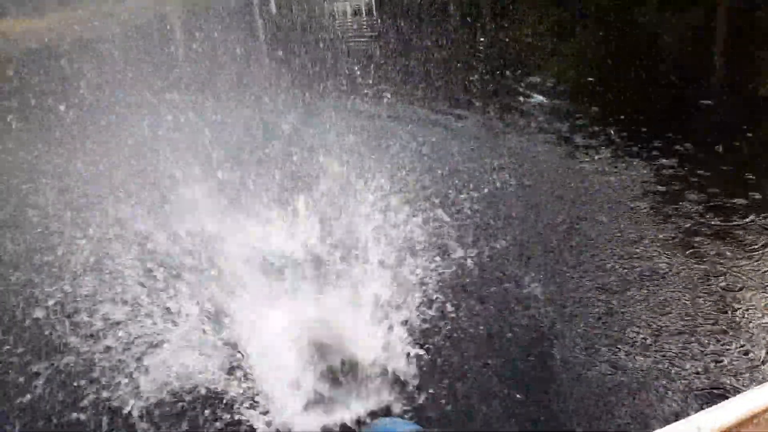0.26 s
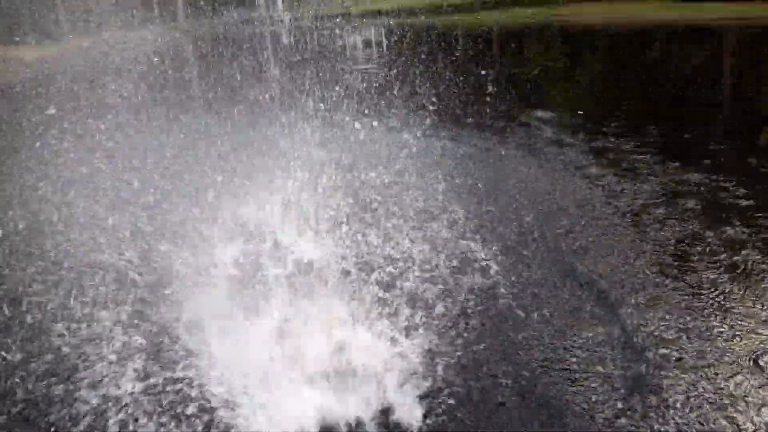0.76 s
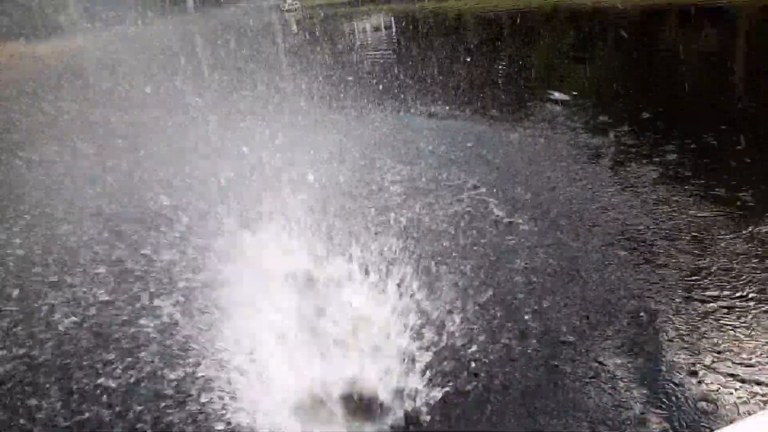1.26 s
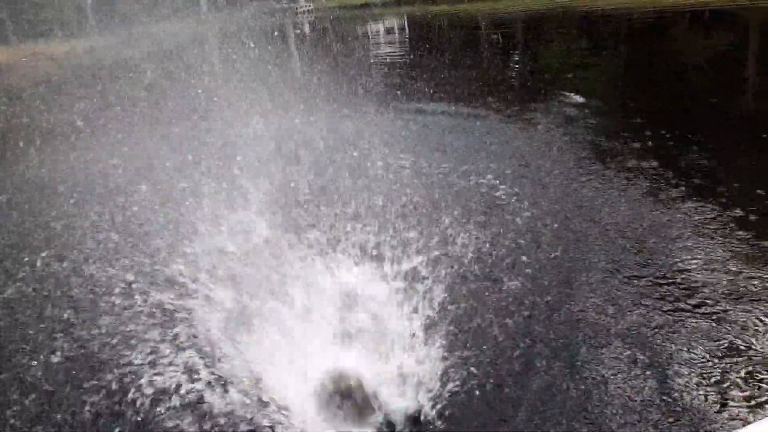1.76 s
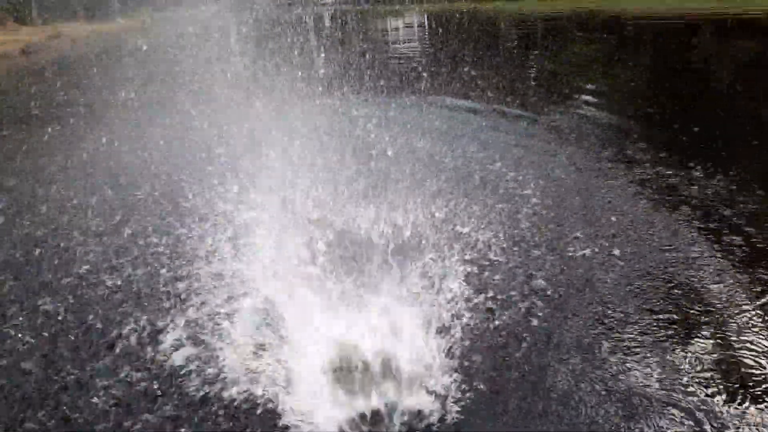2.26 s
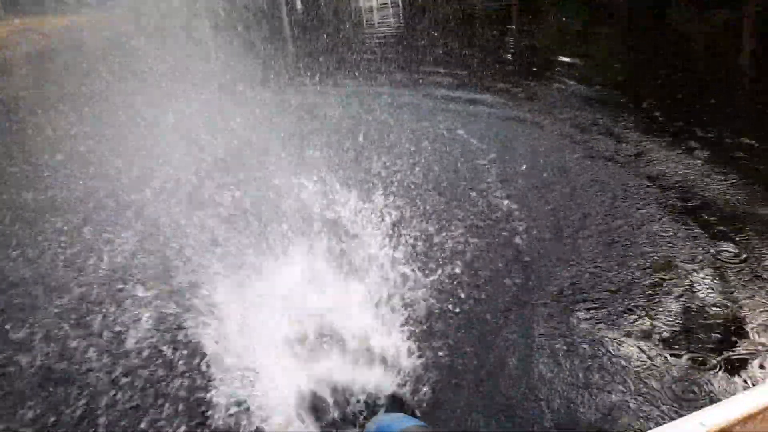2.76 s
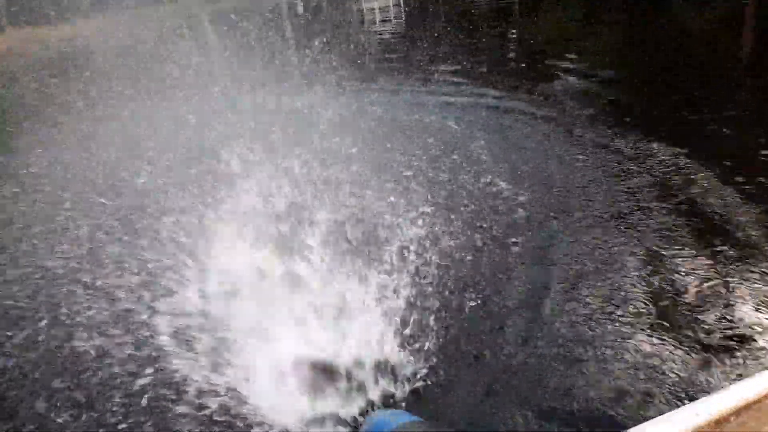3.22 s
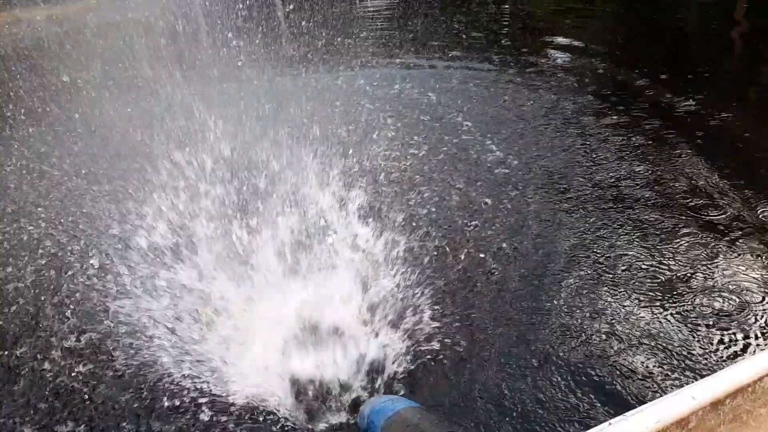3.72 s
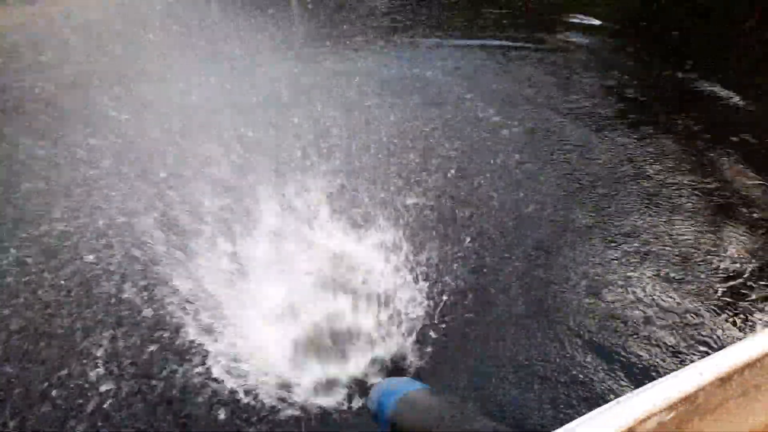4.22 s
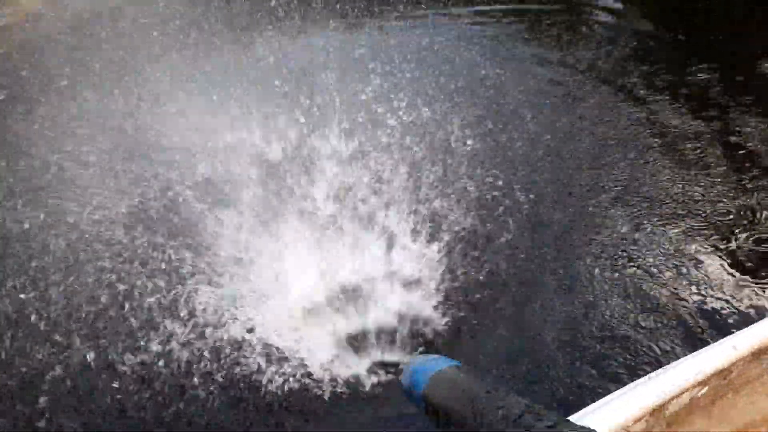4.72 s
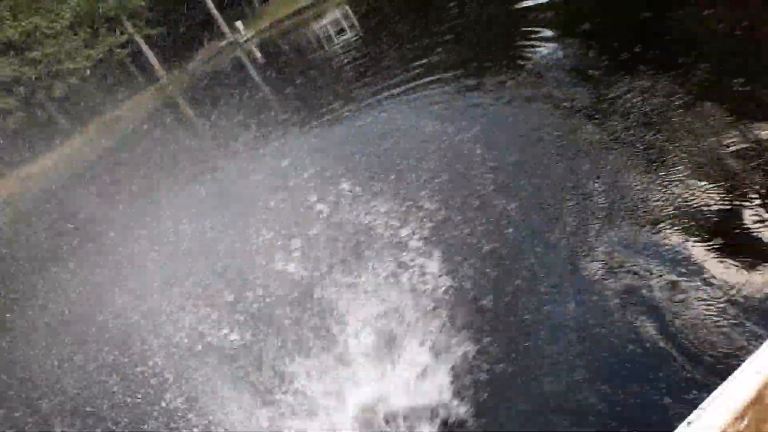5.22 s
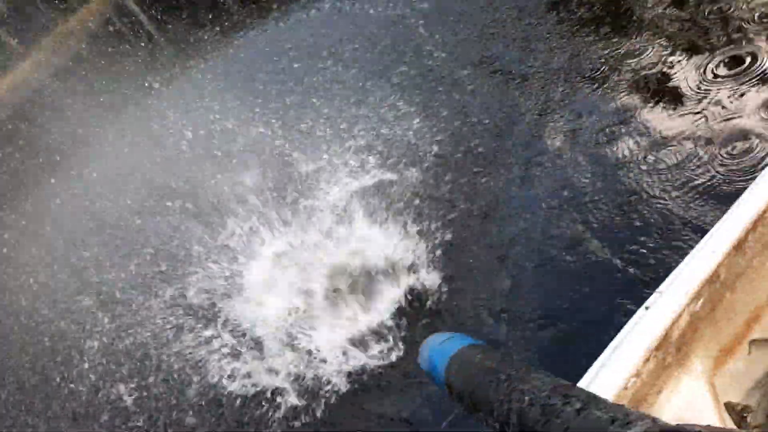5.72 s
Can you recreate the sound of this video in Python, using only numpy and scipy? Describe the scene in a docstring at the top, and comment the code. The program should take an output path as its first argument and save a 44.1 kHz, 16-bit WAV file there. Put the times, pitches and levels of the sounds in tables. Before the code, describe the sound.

For six seconds an electric pump runs at practically constant high speed, already going at the start and still going at the end. It stands close, to the right: a steady hum near 377 Hz, a buzzing tone near 3 kHz and a dominant piercing whine around 4.5 kHz, wrapped in rough, rushing cooling air. Ahead and wide, a hose jet pounds a pond with dense bright hiss, fine droplets and low bubbling. Short, soft gulps of trapped air occur near 0.1, 0.5, 0.75, 0.9, 1.1, 1.3, 1.85, 2.8 and 4.6 s. The whine sinks clearly around 2.1-2.3 s, then returns. At about 5.1 s the upper hiss dulls a little. Near 5.6 s the microphone turns towards the hose: the whine drops briefly, jumps up loud by 5.7 s, then eases, while the hum strengthens and the spray brightens. Open air, close hand-held stereo, little audible echo.

```python
"""A fast electric pump to the right sounds a shaft hum, a piercing whine and rushing cooling air.
Its tones are harmonics locked to one shaft phase; its air is noise shaped by spectral peaks and hollows.
Ahead, its hose drives a steady jet into a pond: ringing bubbles, foam and droplets, with gulps of air.
As the hand-held camera moves, the whine fades and swells; near the end it turns towards the hose
and the tones change balance."""
import sys
import numpy as np
from scipy import signal
from scipy.fft import rfft, irfft, next_fast_len
from scipy.io import wavfile
from scipy.ndimage import uniform_filter1d, minimum_filter1d, map_coordinates

SR = 44100
rng = np.random.default_rng(int(sys.argv[2]) if len(sys.argv) > 2 else 0)


def persist_wave(psi):
    """Save psi, clipped to +-1, as 16-bit WAV."""
    counts = np.round(np.clip(psi, -1, 1) * 32767).astype(np.int16)
    wavfile.write(sys.argv[1], SR, np.atleast_2d(counts).T)


N = 263718

# pump tones before fades: [order (multiple of shaft speed), rms level/dB, left minus right/dB]
PUMP_TONES = [(0.5, -52.5, -2.8), (1, -26.5, -4.1), (2, -43.3, -6.9), (4, -30.3, -3.3), (5, -42.3, -4.8),
              (6, -32.8, -3.5), (7, -42.3, -3.6), (8, -23.5, -5.0), (9, -42.7, -2.7), (10, -38.6, -5.7),
              (11, -43.2, -7.2), (12, -16, -7.2), (13, -39.5, -3.8), (14, -41.0, -4.5), (15, -43.5, -1.4),
              (16, -37.1, 0.3), (17, -44.6, -2.0), (18, -33.5, -0.7), (19, -45.9, 1.4), (23, -51.4, -2.7),
              (24, -45.2, -3.0), (31, -48.6, -5.9), (36, -49.5, 0.5)]
# shaft hum, order 1; only departures from the mean count: [t/s, level/dB]
HUM_FADES = [(0.0, -27.5), (0.06, -27), (1.78, -28), (1.96, -30), (4.68, -26), (4.75, -29), (5.75, -28),
             (5.86, -22), (5.98, -23.5)]
# vane tone, order 8, likewise: [t/s, level/dB]
VANE_FADES = [(0.0, -24.5), (2.05, -25.5), (2.08, -32), (2.21, -25), (4.83, -24), (5.01, -22.5),
              (5.63, -23.5), (5.98, -29)]
# whine, order 12, likewise: [t/s, level/dB]
WHINE_FADES = [(0, -15), (0.45, -13.5), (1.0, -15.5), (1.92, -16), (2.13, -23.5), (2.26, -24.5),
               (2.42, -16.5), (2.85, -14.5), (3.2, -16), (3.65, -13.5), (4.2, -14), (4.45, -16),
               (5.07, -16), (5.15, -14), (5.45, -14.5), (5.57, -23.5), (5.68, -11), (5.76, -12),
               (5.9, -17.5)]
# weaker tones that shift as the camera moves: [order, drift/(dB/s), change with the turn/dB]
TONE_SHIFTS = [(2, -1, 12), (4, -1, 3), (6, -1.2, 0), (11, 0.5, 4), (16, 1, -4), (18, -0.9, 4)]
# cooling-air spectrum before its peaks and hollows: [f/Hz, level/dB per Hz]
AIR_SPECTRUM = [(200, -87), (380, -59), (490, -74), (620, -66), (1000, -67), (1350, -55), (1800, -60.5),
                (2900, -56), (4500, -57), (5700, -66), (6700, -56), (7600, -66.5), (9500, -70),
                (15700, -74)]
# peaks (+) and hollows (-) of the cooling air, from the motor housing and surface reflections:
# [f/Hz, full width at half the dB/Hz, level/dB]
AIR_PEAKS = [(875, 80, 6), (1080, 90, 5), (1180, 70, -6), (1390, 130, -7), (1680, 140, 5), (2255, 60, 6),
             (5300, 300, 3.5), (11680, 450, 7.5)]
# stereo balance of the cooling air: [f/Hz, left minus right/dB]
AIR_BALANCE = [(500, 1.5), (1500, -8), (4000, -2), (6000, -2), (9000, 1), (12000, -5)]
# lag of the pump's sound at the left port, bent round the camera body: [f/Hz, delay/ms]
LEFT_LAG = [(376, .38), (750, .24), (1500, .335), (3000, .362), (4520, .416), (5300, .372), (6000, .33),
            (9000, .36), (15000, .345)]
# weighting of the splash where the jet strikes the pond: [f/Hz, gain/dB]
SPLASH_SPECTRUM = [(25, -92), (58, -102), (100, -82.5), (200, -67), (310, -60), (490, -68.5), (640, -59.5),
                   (1000, -60), (1350, -64), (2500, -62.5), (3300, -58), (3700, -60.5), (4300, -61),
                   (5200, -56), (6700, -59.5), (7500, -66), (8300, -66), (15700, -70)]
# likeness of the splash at the two microphone ports: [f/Hz, correlation from -1 to 1]
PORT_CORRELATION = [(100, 0.84), (350, 0.76), (600, 0.42), (1200, 0.14), (5000, 0.076), (14000, 0)]
# gulps, when the jet drags a pocket of air under: [t/s, rms level at the crest before pan/dB, bubble f/Hz]
AIR_GULPS = [(.08, -30, 855), (.48, -28, 880), (.74, -26, 760), (.93, -28, 1010), (1.07, -29, 875),
             (1.33, -32, 820), (1.85, -25.5, 780), (2.8, -27, 790), (4.63, -30, 940)]

# the shaft slows very slightly under its load
SHAFT_HZ, SAG_HZ_PER_S = 377.15, .19
# the turn towards the hose: middle and time scale, and the extra left-port lag it gives the pump
TURN_S, TURN_LENGTH_S, TURN_LAG_MS = 5.64, 0.086, 0.053
# the churning eases; the turn favours the spray over the cooling air
CHURN_DB_PER_S, SPRAY_TURN_DB, AIR_TURN_DB = -0.13, 2, -1.8
# the directional upper hiss creeps up, drops as the camera tilts away and partly returns with the turn
TILT_S, TILT_LENGTH_S = 5.1, 0.032
HISS_DB_PER_S, HISS_TILT_DB, HISS_TURN_DB = .2, -3, 0.4
# share of the whine's fades, in dB, that the air noise near its pitch follows
AIR_FADE_SHARE = .55
BAND_LIMIT_HZ = 15780


def pump_tones(jitter_hz=.12, flutter_db=0.68, waver_db=4.0):
    """Harmonic radiation: all tones share one shaft phase; the weak ones waver in the turbulent flow."""
    shaft_hz = SHAFT_HZ - SAG_HZ_PER_S * seconds() + jitter_hz * wobble(45)
    angle = 2 * np.pi * np.cumsum(shaft_hz) / SR
    strong = {1: HUM_FADES, 8: VANE_FADES, 12: WHINE_FADES}
    shift_db = {round(order): drift(db_per_s) + turn_db * turned()
                for order, db_per_s, turn_db in TONE_SHIFTS}
    out = np.zeros((2, N))
    for order, level_db, pan_db in PUMP_TONES:
        if order in strong:
            gain = amp(swing(strong[order]) + flutter_db * wobble(35))
        else:
            waver = unit(amp(waver_db * wobble(50)))
            gain = amp(shift_db.get(order, 0)) * waver
        phase = order * angle + 2 * np.pi * rng.random()
        tone = amp(level_db) * gain * np.sqrt(2) * np.sin(phase)
        out += panned(pan_db) * tone
    return out, angle


def cooling_air(angle, chop):
    """Flow noise: turbulence, modulated once per shaft turn, is shaped by spectral peaks and hollows."""
    turbulence = patchy(white(channels=1), depth_db=1)
    chopped = turbulence * (1 + chop * np.cos(angle))

    def response(hz):
        peaks_db = sum(db / (1 + (2 * (hz - centre_hz) / width_hz) ** 2)
                       for centre_hz, width_hz, db in AIR_PEAKS)
        ports_db = np.outer([.5, -.5], along(AIR_BALANCE, hz))
        return amp(along(AIR_SPECTRUM, hz) + peaks_db + ports_db)

    return amp(AIR_TURN_DB * turned()) * filtered(chopped, response)


def from_right(x):
    """Interaural-type delay: sound from the right reaches the left port later, more so after the turn."""
    def split_lag(hz):
        return np.exp(np.outer([-1, 1], 1j * np.pi * hz * along(LEFT_LAG, hz) / 1000))

    left, right = filtered(x, split_lag)
    delay_s = TURN_LAG_MS * turned() / 1000
    later_left = map_coordinates(left, [(seconds() - delay_s) * SR], order=5)
    return np.array([later_left, right])


def splash(foam_db=-1.5, gurgle_db=-6, droplet_db=-9):
    """Jet impact: submerged bubbles ring low while droplets and foam radiate a broadband hiss."""
    foam = amp(foam_db) * patchy(white(channels=2), depth_db=2.5)
    gurgle = amp(gurgle_db) * bubbles(count=1500, low_hz=274.0, high_hz=1764, cycles=9.7, spread_db=2.5)
    droplets = amp(droplet_db) * bubbles(count=24000, low_hz=1840, high_hz=11000, cycles=2.0, spread_db=3.0)

    def mid_side(hz):
        # the cosine of twice this angle is the correlation of the ports
        turn = np.arccos(np.clip(along(PORT_CORRELATION, hz), -1, 1)) / 2
        return amp(along(SPLASH_SPECTRUM, hz)) * [np.cos(turn), np.sin(turn)]

    mid, side = filtered(foam + gurgle + droplets, mid_side)
    water = np.array([mid + side, mid - side])
    churn = filtered(water, lambda hz: 1 / (1 + (hz / 1800) ** 2))
    spray = water - churn
    churn_db = drift(CHURN_DB_PER_S) + 0.9 * wobble(22)
    spray_db = SPRAY_TURN_DB * turned() + 0.21 * wobble(24)
    return churn * amp(churn_db) + spray * amp(spray_db)


def bubbles(count, low_hz, high_hz, cycles, spread_db, rise=0.18):
    """Bubble resonance: a cloud of damped rings, 0 dB per Hz in band, rising in pitch near the surface."""
    when, pitch, luck, place = rng.random((count, 4)).T[:, :, None]
    hz = low_hz * (high_hz / low_hz) ** pitch
    # a few bubbles, those of least luck, ring much louder
    size = hz * amp(-spread_db * np.log(np.maximum(luck, .01)))
    step = np.arange(int(cycles * SR / low_hz))
    turns = hz * step / SR
    age = turns / cycles
    oscillation = np.sin(2 * np.pi * turns * (1 + rise * np.minimum(age, 1)))
    envelope = amp(-40 * age) * (1 - np.exp(-2 * turns))
    ring = size * oscillation * envelope
    index = (when * N).astype(int) + step
    pair = [np.bincount(index.ravel(), (ring * part(2 * np.pi * place)).ravel(), N)[:N]
            for part in (np.cos, np.sin)]
    return unit(np.array(pair)) * np.sqrt(high_hz - low_hz)


def gulps(length_s=0.019, width_hz=230, pan_db=-2):
    """Air entrainment: each pocket breaks into a brief cluster of like bubbles, heard as a noise band."""
    out = np.zeros((2, N))
    for crest_s, level_db, bubble_hz in AIR_GULPS:
        band = lambda hz: 1 / (1 + ((hz - bubble_hz) / (width_hz / 2)) ** 4)
        cluster = unit(filtered(white(channels=2), band))
        envelope = np.exp(-.5 * ((seconds() - crest_s) / length_s) ** 2)
        out += amp(level_db) * cluster * envelope
    return out * panned(pan_db)


def turned():
    """Rotation of the receiver: progress of the turn towards the hose, from 0 to 1."""
    return move(TURN_S, TURN_LENGTH_S)


def move(middle_s, length_s):
    """Smooth transition: a camera move follows a hyperbolic tangent, from 0 to 1."""
    return .5 + .5 * np.tanh((seconds() - middle_s) / length_s)


def swing(rows):
    """Relative level: (t/s, level/dB) points interpolated, as dB about their average over time."""
    db = np.interp(seconds(), *np.transpose(rows))
    return db - db.mean()


def drift(db_per_s):
    """Exponential gain: a steady change in dB, 0 dB halfway through."""
    return db_per_s * (seconds() - N / SR / 2)


def wobble(rate):
    """Random modulation: a smooth random curve, rate knots per second."""
    knots = rng.standard_normal(4096)
    return map_coordinates(knots, [np.arange(N) * rate / SR], mode="wrap")


def patchy(x, depth_db):
    """Turbulent intermittency: random gain patches, a few hundred Hz wide and some tens of ms long."""
    z = signal.stft(x, nperseg=512)[2]
    blur = np.outer(np.hanning(7), np.hanning(13))
    field = signal.fftconvolve(rng.standard_normal(z.shape[1:]), blur, "same")
    return signal.istft(z * amp(depth_db * unit(field)), nperseg=512)[1][:, :N]


def white(channels):
    """White noise: equal power at all frequencies, 0 dB per Hz."""
    return rng.standard_normal((channels, N)) * np.sqrt(SR / 2)


def band_gain(x, gain_db, centre_hz, width_hz):
    """Band equalisation: one band of x is raised or lowered over time."""
    band = filtered(x, lambda hz: np.exp(-((hz - centre_hz) / width_hz) ** 4))
    return x + band * (amp(gain_db) - 1)


def filtered(x, response):
    """Linear filtering: the spectrum of x times a complex response of frequency."""
    size = next_fast_len(N + SR // 4)
    return irfft(rfft(x, size) * response(np.fft.rfftfreq(size, 1 / SR)), size)[..., :N]


def along(points, hz):
    """Logarithmic frequency axis: (f/Hz, value) points interpolated in log f."""
    f, v = np.transpose(points)
    return np.interp(np.log(hz + 1), np.log(f), v)


def panned(pan_db):
    """Level difference: left and right gains that are pan_db apart."""
    return amp([[pan_db / 2], [-pan_db / 2]])


def amp(db):
    """Decibel law: level in dB to amplitude gain."""
    return 10 ** (np.asarray(db) / 20)


def unit(x):
    """Normalisation: x scaled to rms 1."""
    return x / np.sqrt(np.mean(x ** 2) + 1e-20)


def seconds():
    """Sampling: the time of each sample."""
    return np.arange(N) / SR


def scene():
    """Superposition: pump at the right plus splash ahead; air near the whine's pitch fades with it."""
    tones, angle = pump_tones()
    air = cooling_air(angle, chop=0.33)
    air = band_gain(air, AIR_FADE_SHARE * swing(WHINE_FADES), centre_hz=4900, width_hz=580)
    pump = from_right(tones + air)
    mix = pump + splash() * panned(-1.2) + gulps()
    tilt_db = HISS_TILT_DB * move(TILT_S, TILT_LENGTH_S)
    hiss_db = drift(HISS_DB_PER_S) + tilt_db + HISS_TURN_DB * turned()
    return band_gain(mix, hiss_db, centre_hz=7030, width_hz=2050)


def record(dry):
    """Peak and band limiting: peaks above full scale are smoothly ducked and the top band is cut."""
    needed = 1 / np.maximum(np.abs(dry).max(axis=0), 1)
    gain = uniform_filter1d(minimum_filter1d(needed, size=201), size=201)
    return filtered(dry * gain, lambda hz: hz < BAND_LIMIT_HZ)


dry = scene()
out = record(dry)
persist_wave(out)
```